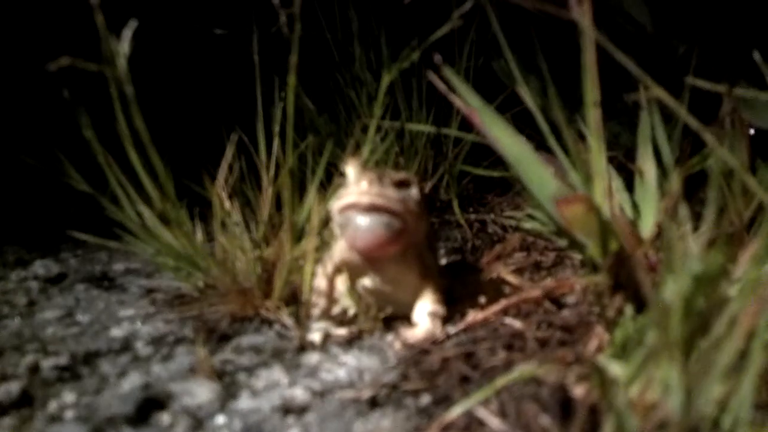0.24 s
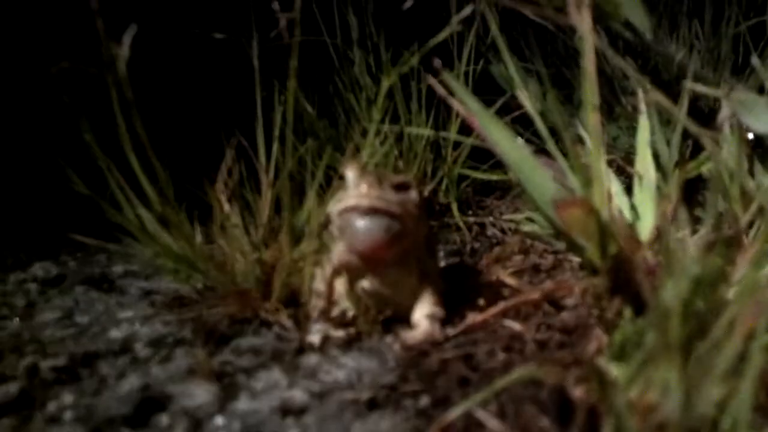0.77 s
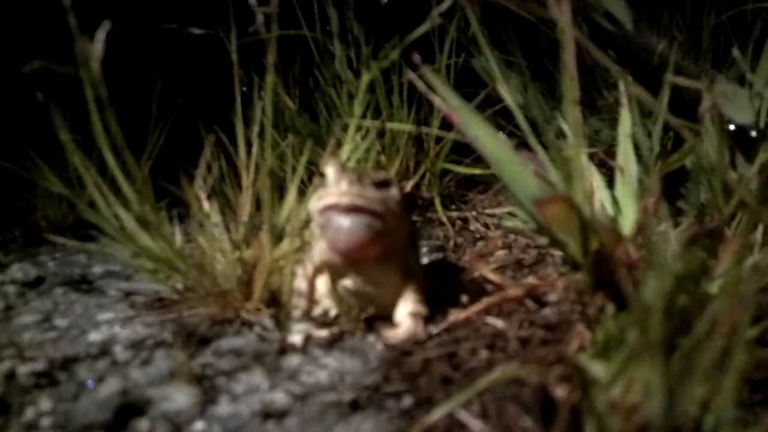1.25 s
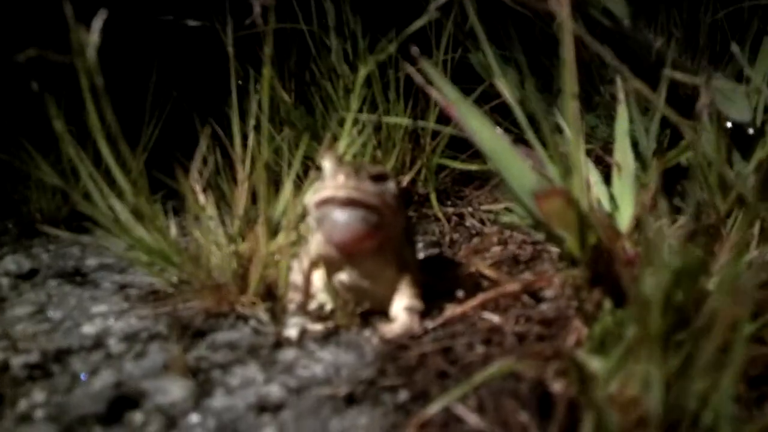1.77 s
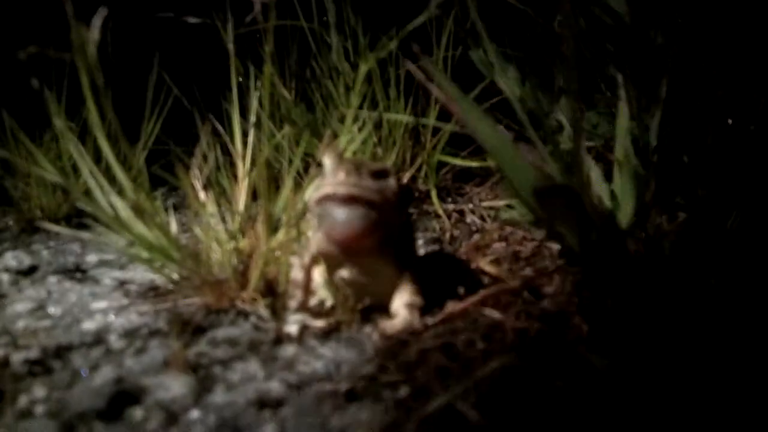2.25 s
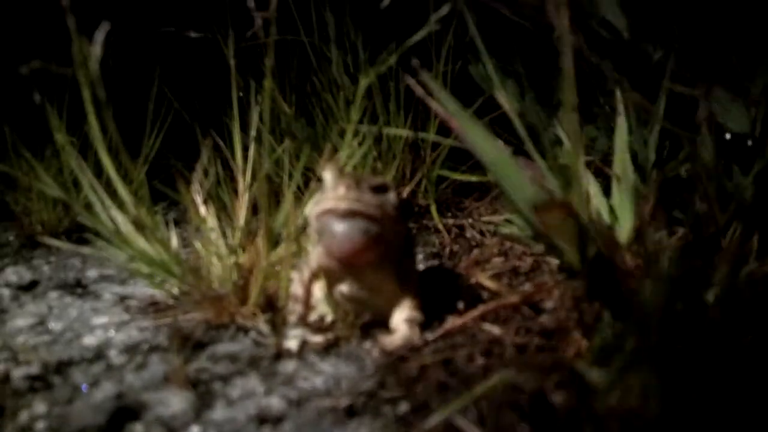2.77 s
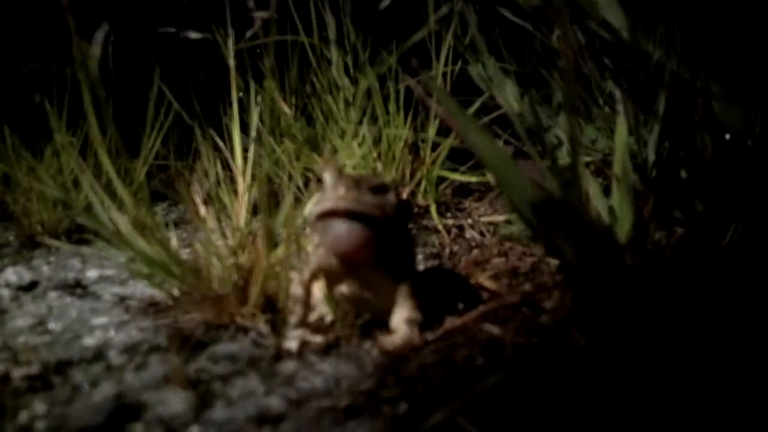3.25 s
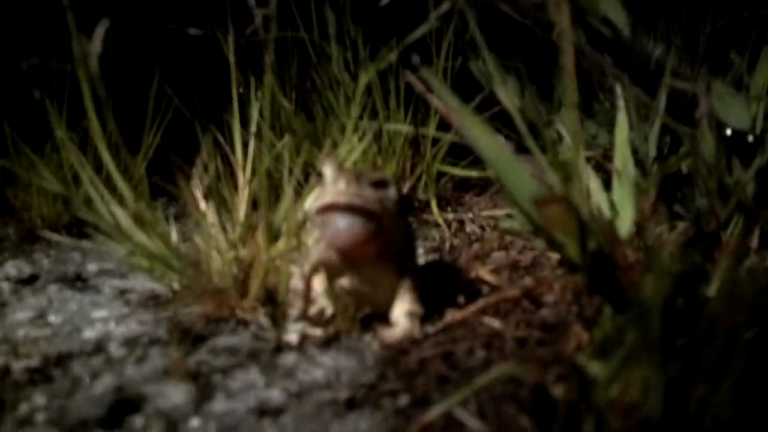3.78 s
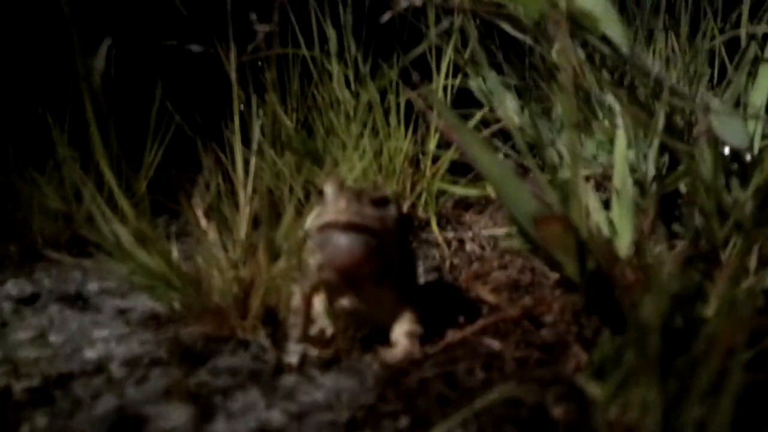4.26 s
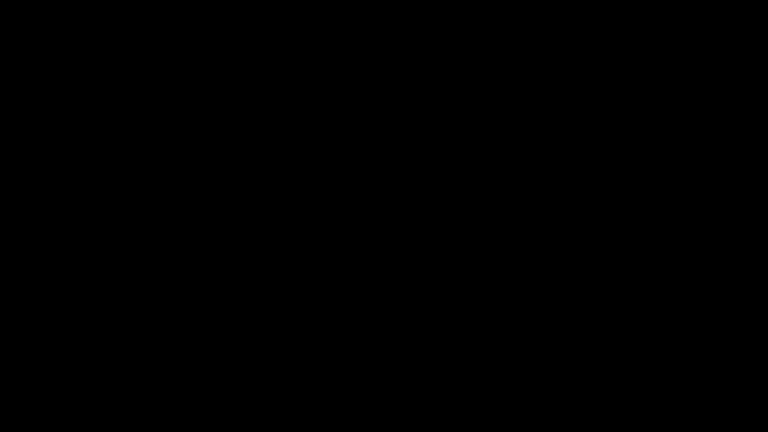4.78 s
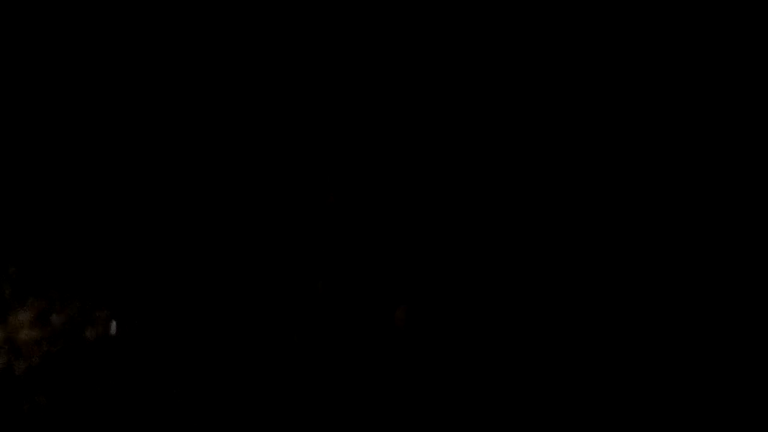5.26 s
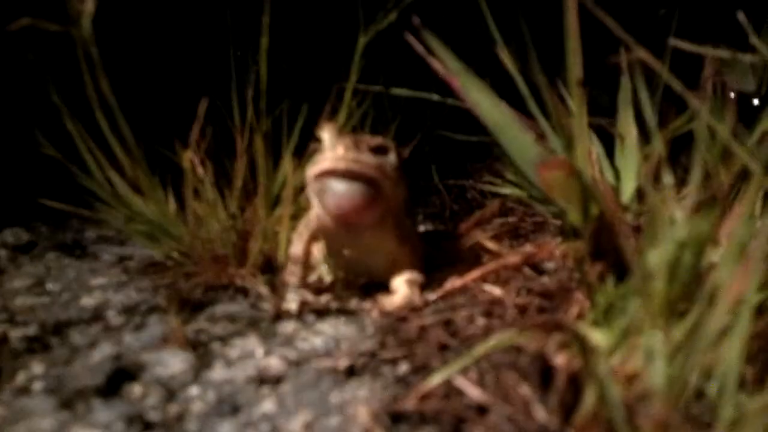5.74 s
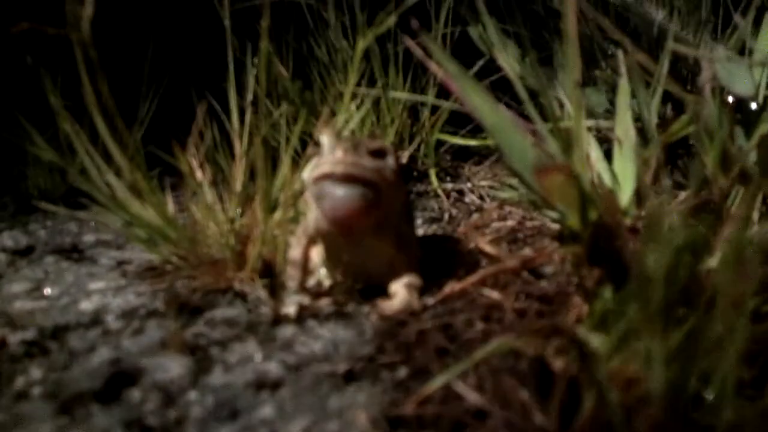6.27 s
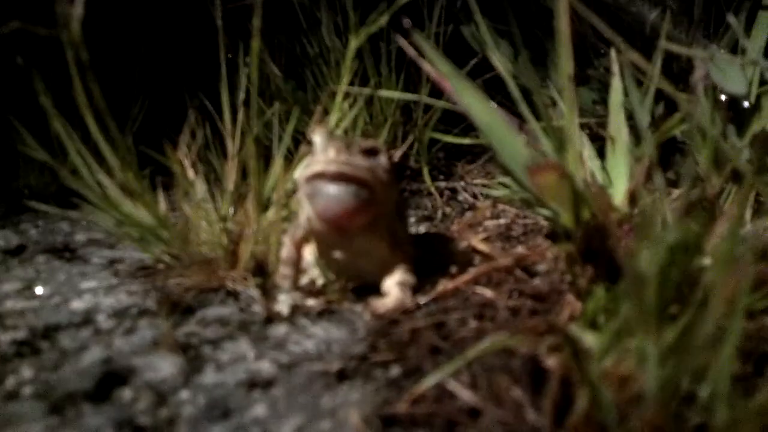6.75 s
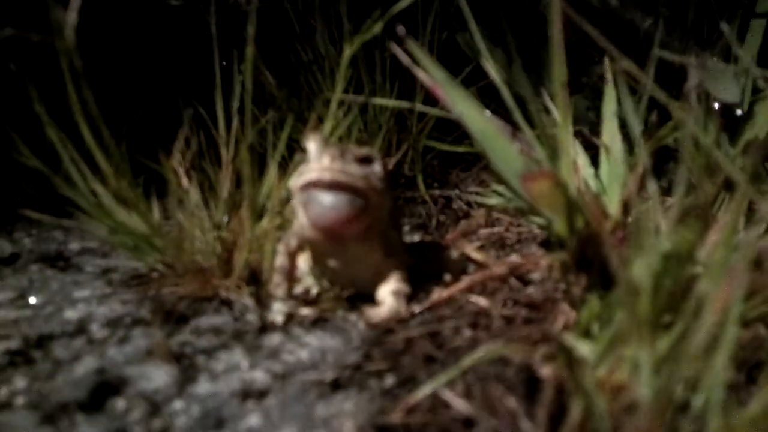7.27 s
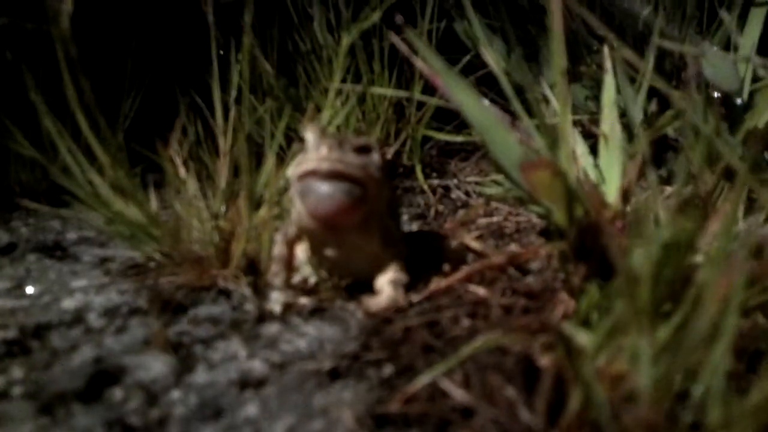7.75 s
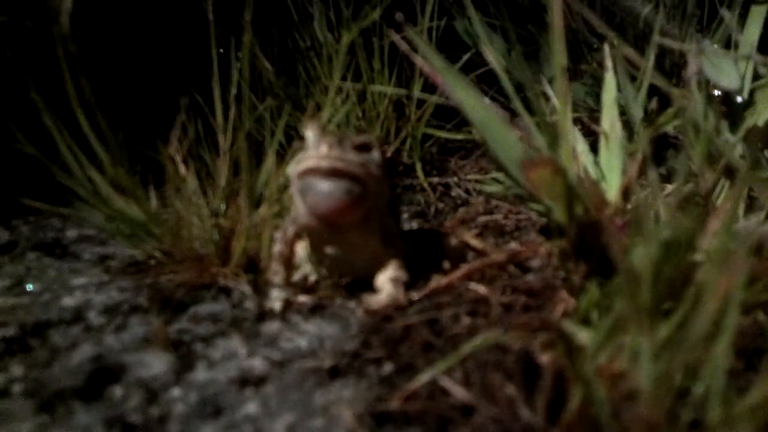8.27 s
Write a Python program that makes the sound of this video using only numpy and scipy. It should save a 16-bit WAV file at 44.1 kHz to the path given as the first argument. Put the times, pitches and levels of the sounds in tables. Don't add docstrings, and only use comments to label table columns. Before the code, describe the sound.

Night at a pond edge, heard in wide stereo by a small handheld camera. From 0 to about 8.7 seconds a toad holds one low, smooth droning trill near 170 hertz, swelling most around 2 and 5.7 seconds and sinking very slightly in pitch. Other toads blur into low, wavering hums behind it; far frogs make a grainy midrange wash with gentle swells. A rapid cricket chirr near 6 kilohertz shimmers steadily on the left, and very high katydid hiss comes in bouts about once a second. Soft air rumbles beneath. A faint rub at 1.0 and a dull bump at 1.7; light finger taps at 4.4, a cluster at 4.9 to 5.0, low thuds at 5.1, a tick at 5.6, another thud at 5.75. At 6.15 to 6.2 a sharp, dry double switch click, its release loudest, with slight rustle. Then only the night chorus continues to the end.

```python
import sys
import numpy as np
from scipy import signal
from scipy.fft import rfft, irfft, next_fast_len
from scipy.io import wavfile
from scipy.ndimage import uniform_filter1d

SR = 44100
rng = np.random.default_rng(int(sys.argv[2]) if len(sys.argv) > 2 else 0)


def makeup_ratio(level_db):
    decades = np.asarray(level_db, float) / 20
    return 10 ** decades


def output_pcm(signal):
    pcm = np.clip(np.atleast_2d(signal).T, -1, 1) * 32767
    wavfile.write(sys.argv[1], SR, np.round(pcm).astype(np.int16))


N = 375732
TIME = np.arange(N) / SR

# (frequency [Hz], ports' sum [dB per Hz], ports' difference [dB per Hz],
# lean [-1 right .. 1 left])
AIR_COLOUR = [(38, -87.7, -103.6, 0.05), (71, -81, -92, 0.15), (116, -73, -92, 0.38), (191, -75, -83, 0.19),
              (286, -80, -82.5, 0.41), (343, -76, -91, 0.51), (364, -84.5, -91, 0.35),
              (448, -81, -76, 0.43), (454, -76, -94, -0.12), (521, -78.5, -90, -0.095),
              (550, -83, -80, 0.02), (686, -82, -84.5, -0.16), (795, -91, -88, -0.13),
              (1006, -93.4, -96, -0.046)]
# (middle [s], rise [dB], half length [s])
AIR_GUSTS = [
    (.05, -4, .2),
    (1.0, 1.5, .4),
    (3.0, 2.5, .25),
    (3.9, -2, .4),
    (5.72, 3, .2),
    (8.35, -3, .25),
]
CHORUS_COLOUR = [(1016, -94.5, -88.5, -0.56), (1250, -96.5, -91, -0.81), (1677, -93.5, -92, -0.27),
                 (1948, -83, -79.5, -0.46), (2170, -86.5, -86.5, -1.1), (2390, -85.5, -85, -1.1),
                 (2945, -81.5, -83.5, -1.1), (3546, -89, -89.1, -0.98), (3850, -91, -86, -0.24),
                 (4560, -89, -87.5, -0.47), (4930, -92, -94, -0.59), (6020, -91.5, -93, 0.2),
                 (5900, -81.5, -84, 0.87), (6935, -105, -105, 0.23)]
# (middle [s], rise above the lull [dB], half length [s])
CHORUS_SWELLS = [(.25, 2, .17), (.8, 3.5, 0.12), (2.03, 4, .17), (3.1, 1.5, .35), (4.53, 1.5, 0.26),
                 (5.43, 1.5, 0.23), (5.85, 2, 0.25), (6.55, 2, 0.2), (7.02, 1, 0.1), (7.71, 1.5, 0.22),
                 (8.33, 3.5, 0.16)]
KATYDID_COLOUR = [(7430, -119, -116, 0), (7800, -114, -112, -0.18), (10400, -111, -113, -.2),
                  (9200, -111, -110, -.2), (11800, -107, -106, -0.15), (13600, -102, -102, -0.9),
                  (14450, -95, -95, -0.59), (15300, -95, -92, -.7), (15600, -89, -101, -.3)]
# (middle [s], rise above the lull [dB], half length [s])
KATYDID_BOUTS = [(.27, 6, 0.26), (1.05, 5, 0.31), (2.0, 6.5, 0.3), (2.93, 3.5, 0.24), (3.58, 5.5, 0.23),
                 (4.8, 5.5, 0.55), (5.42, 2.5, 0.23), (6.58, 6, 0.18), (7.71, 2.5, 0.15), (8.42, 6, 0.21)]
# (frequency [Hz], width [Hz], ports' sum [dB], ports' difference [dB])
FAR_TOADS = [(99.5, 12, -60, -71), (132.7, 2.13, -57, -70.5), (150, 3.7, -53, -65), (253.8, 4.5, -60, -72),
             (302, 2.8, -68, -73), (458, 2, -64.5, -79), (604, 6.9, -68, -84)]
# (time [s], knock level [dB], knock frequency [Hz], crack level [dB], treble level [dB])
TORCH_CLICKS = [
    (4.356, -42, 750, -41, 8),
    (4.378, -34, 650, -35, 12),
    (4.937, -37, 600, -35, 14),
    (4.948, -39, 500, -37, 10),
    (4.9835, -36, 590, -37, 11),
    (5.009, -35, 480, -37, 11),
    (5.5848, -32, 850, -28, 8),
]
SWITCH_CLICKS = [
    (6.1548, -29.5, 620, -31, 14),
    (6.162, -30, 690, -28, 10),
    (6.168, -28, 480, -24, 11),
    (6.1886, -25, 480, -18.5, -2),
    (6.197, -38, 400, -28, 7),
    (6.203, -36, 420, -32, 7),
]
SPRING_REBOUNDS = [
    (6.1712, -30, 450, -38, 4),
    (6.1912, -29, 480, -32, 0),
]
# (time [s], peak level [dB], frequency [Hz], share at right port [ratio])
BUMPS = [
    (1.676, -34, 170, -0.63),
    (5.085, -39, 160, -0.99),
    (5.151, -33.5, 210, 0.0044),
    (5.742, -36, 150, -1.1),
]
# (middle [s], half length [s], level [dB], added treble [dB])
RUSTLES = [
    (1.02, .045, -56, -30),
    (4.945, .035, -55, -8),
    (4.38, .02, -60, -12),
    (5.59, .012, -60, -10),
    (6.161, .011, -51, -2),
    (6.198, .011, -52, -3),
    (6.25, .015, -62, -10),
]
# (frequency [Hz], width [Hz], level [dB])
SHELL_RESONANCES = [(2100, 600, -3), (2750, 950, 0), (4300, 1300, -5.5)]
# (multiple [count], level [dB], ports' difference [dB])
TOAD_SAC = [(1, 10, -26), (2, -5, -19), (3, -5, -12), (4, -6, -10)]
# (middle [s], rise above the lull [dB], half length [s])
TOAD_SURGES = [(.12, 6, 0.29), (.85, 6, .17), (1.17, 8.5, 0.15), (1.98, 15, 0.43), (2.58, 10.5, 0.2),
               (3.05, 5, 0.21), (3.55, 3, 0.23), (3.96, 9, .22), (4.45, 10.5, 0.29), (5.08, 7, 0.35),
               (5.65, 14, .11), (5.88, 7, 0.062), (6.28, 7, 0.12), (7.35, 5.5, 0.16), (7.8, 9.5, 0.19),
               (8.19, -2, .07), (8.46, -2, .1)]
# (multiple [count], middle [s], rise [dB], half length [s])
SAC_BLOOMS = [
    (2, 1.3, 9.5, 1.1),
    (2, 5.1, 5, 0.48),
    (3, 0.72, 8.5, 0.77),
    (4, 1.14, 4.5, .4),
    (4, 3.5, -8, 0.94),
    (4, 8.4, 2, 0.37),
]


def walk(rate):
    held = np.repeat(rng.standard_normal(int(N / SR * rate) + 2), 8)
    slewed = 1.3 * uniform_filter1d(uniform_filter1d(held, size=8), size=8)
    return np.interp(TIME * rate * 8, np.arange(len(held)), slewed)


def surges(rows):
    t = TIME[::64]
    rises = (db * np.exp(-((t - middle) / half) ** 2) for middle, db, half in rows)
    return np.interp(TIME, t, sum(rises, 0 * t))


def ring(x, hz, width):
    return signal.lfilter(*signal.iirpeak(hz, hz / width, SR), x)


def ports(total, difference):
    return np.array([total + difference, total - difference])


def crowd(colour, lead, flicker_db, flicker_rate, grain_db):
    hz, sum_db, diff_db, lean = np.transpose(colour)
    size = next_fast_len(N)
    octave = np.log2(np.arange(1, size // 2 + 2) * SR / size)

    def gain(db):
        return makeup_ratio(np.interp(octave, np.log2(hz), db, -150, -150)) * np.sqrt(SR / 2)

    tie = np.clip(np.interp(octave, np.log2(hz), lean), -.9, .9) + 1j * np.clip(lead, -.4, .4)
    grain_level = makeup_ratio(grain_db * rng.standard_normal((2, size // 44 + 1)))
    grains = rng.standard_normal((2, size)) * grain_level.repeat(44, axis=1)[:, :size]
    one, other = rfft(grains / grains.std())
    difference = tie * one + np.sqrt(1 - abs(tie) ** 2) * other
    pair = ports(gain(sum_db) * one, gain(diff_db) * difference)
    out = 0
    for centre in np.arange(np.log2(hz[0]), np.log2(hz[-1]) + 1):
        share = np.cos(np.pi / 2 * np.clip(octave - centre, -1, 1)) ** 2
        out = out + irfft(pair * share, size)[:, :N] * makeup_ratio(flicker_db * walk(flicker_rate))
    return out


def night_air():
    fade_db_per_s = 0.16
    level_db = -fade_db_per_s * (TIME - TIME.mean()) + surges(AIR_GUSTS)
    return makeup_ratio(level_db) * crowd(AIR_COLOUR, 0.074, flicker_db=1.4, flicker_rate=5, grain_db=0.71)


def frog_chorus():
    lull_db = -1.04
    level = makeup_ratio(lull_db + surges(CHORUS_SWELLS))
    return level * crowd(CHORUS_COLOUR, 0.11, flicker_db=1.23, flicker_rate=8, grain_db=0.65)


def katydids():
    lull_db = -3.5
    level = makeup_ratio(lull_db + surges(KATYDID_BOUTS))
    return level * crowd(KATYDID_COLOUR, .01, flicker_db=1.45, flicker_rate=16, grain_db=1.15)


def far_toads():
    out = 0
    for hz, width, sum_db, diff_db in FAR_TOADS:
        drone, stray = (ring(ring(rng.standard_normal(N), hz, width), hz, 3 * width) for _ in range(2))
        slope = np.gradient(drone) * SR / (2 * np.pi * hz)
        difference = 0.5 * slope + 0.86 * stray
        out = out + ports(makeup_ratio(sum_db) * drone, makeup_ratio(diff_db) * difference) / drone.std()
    return out


def cricket():
    strokes_per_s, level_db, drift_db = 43.722, -48.5, 0.57
    strokes = .04 + strokes_per_s * TIME
    index = strokes.astype(int)
    chance = rng.standard_normal((index.max() + 1, 4))[index].T
    place = (strokes - index - .45 + .012 * chance[0]) / .225
    swell = np.clip(1 - np.abs(place) ** 2.2, 0, 1)
    swell = swell * makeup_ratio(.9 * chance[1] + 1.0 * walk(300))
    sag_hz = 220 * np.clip(place + .1, 0, 1.2) ** 1.5
    hz = 6400 + 22 * chance[2] - sag_hz + 25 * walk(400)
    turns = np.cumsum(hz) / SR + chance[3]
    wing = signal.butter(4, [5750, 6800], "band", fs=SR, output="sos")
    tone = signal.sosfilt(wing, swell * np.sin(2 * np.pi * turns))
    tone = tone * makeup_ratio(level_db + drift_db * walk(2.13) - 4.5) / tone.std()
    scatter = rng.standard_normal((2, 2600)) * np.exp(-np.arange(2600) / 800.)
    tail = signal.fftconvolve(tone[None], scatter / np.sqrt(350), axes=1)[:, :N]
    return ports(tone, .55 * tone) + makeup_ratio(-16) * tail


def rustles():
    cloth = rng.standard_normal((2, N)) * makeup_ratio(3.5 * walk(250))
    body, edge = 0, 0
    for middle, half, db, treble_db in RUSTLES:
        rub = np.exp(-((TIME - middle) / half) ** 2)
        body = body + makeup_ratio(db) * rub
        edge = edge + makeup_ratio(db + treble_db) * rub
    dull = 5 * ring(cloth, 950, 800) + 3 * ring(ring(cloth, 3300, 1900), 3300, 1900)
    return body * dull + edge * 3 * ring(cloth, 11500, 9000)


def camera_bumps():
    out, t = np.zeros((2, N + 4410)), np.arange(2205) / SR
    for s, db, hz, share in BUMPS:
        bump = np.sin(2 * np.pi * hz * t) * (t * hz) ** 2 * np.exp(-t * hz / 0.22)
        i = int(s * SR)
        out[:, i:i + len(t)] += makeup_ratio(db) * np.outer([1, share], bump / np.abs(bump).max())
    return out[:, :N]


def torch_clicks():
    out, t = np.zeros((2, N + 4410)), np.arange(2205) / SR
    groups = [(8, TORCH_CLICKS), (9, SWITCH_CLICKS), (-13, SPRING_REBOUNDS)]
    hits = [(lag, *row) for lag, rows in groups for row in rows]
    for lag, s, knock_db, hz, crack_db, treble_db in hits:
        delay = np.array([[max(-lag, 0)], [max(lag, 0)]]) / SR
        cycles = np.maximum(t - delay, 0) * hz
        knock = np.sin(2 * np.pi * cycles) * cycles * np.exp(-cycles / .52)
        burst = rng.standard_normal((2, len(t))) * (.3 * np.exp(-t / .0004) + .07 * np.exp(-t / .004))
        burst[:, 4] += [-.4, 1.6]
        crack = sum(makeup_ratio(db) * ring(ring(burst, f, width), f, width) for f, width, db in SHELL_RESONANCES)
        treble = ring(ring(burst, 10500, 11000), 10500, 11000)
        crack = crack / np.abs(crack).max() + makeup_ratio(treble_db - 10) * treble
        i = int(s * SR)
        out[:, i:i + len(t)] += makeup_ratio(knock_db) * knock / np.abs(knock).max() + makeup_ratio(crack_db) * crack
    return out[:, :N]


def near_toad():
    lull_db, mean_db = -67.5, -64
    start_hz, sag_hz_per_s, tiring_hz_per_s2 = 172, .55, .053
    surge_db = lull_db + surges(TOAD_SURGES)
    pitch = start_hz - sag_hz_per_s * TIME - tiring_hz_per_s2 * TIME ** 2
    turns = np.cumsum(pitch + 0.832 * walk(12)) / SR
    out = 0
    for k, sac_db, diff_db in TOAD_SAC:
        effort_db = surge_db / k + (1 - 1 / k) * mean_db + 3.7 * (k > 1) * walk(2.55)
        effort_db = effort_db + surges([row[1:] for row in SAC_BLOOMS if row[0] == k])
        wave = np.sqrt(2) * makeup_ratio(effort_db + sac_db) * np.exp(2j * np.pi * k * turns)
        out = out + ports(wave.real, -makeup_ratio(diff_db) * wave.imag)
    return out


def scene():
    night = night_air() + frog_chorus() + katydids() + far_toads()
    hands = rustles() + camera_bumps() + torch_clicks()
    return night + cricket() + hands + near_toad()


def band_limit(x):
    return signal.sosfilt(signal.butter(12, 16880, fs=SR, output="sos"), x)


def record(dry):
    lag, crossfeed, top_hz = 16, .98, 15650
    late = np.pad(dry, ((0, 0), (lag, 0)))[::-1, :N]
    low_pass = signal.ellip(10, .2, 70, top_hz, fs=SR, output="sos")
    stereo = signal.sosfilt(low_pass, dry - crossfeed * late)
    return band_limit(stereo)


dry = scene()
out = record(dry)
output_pcm(out)
```